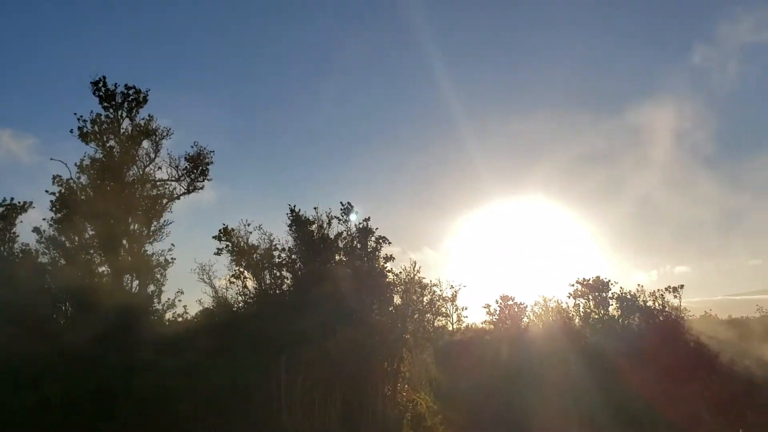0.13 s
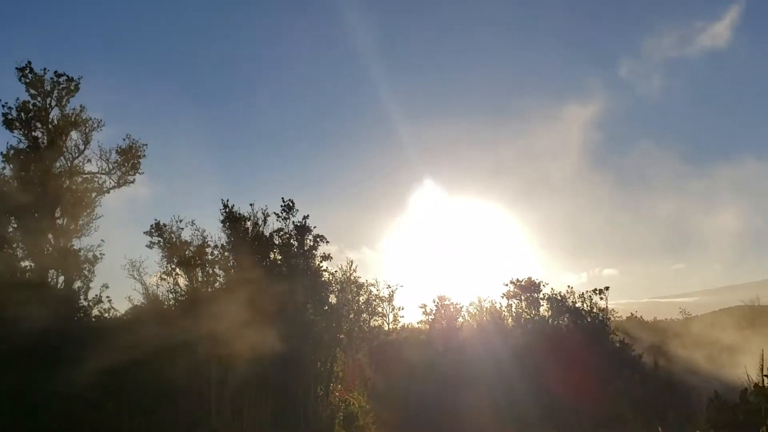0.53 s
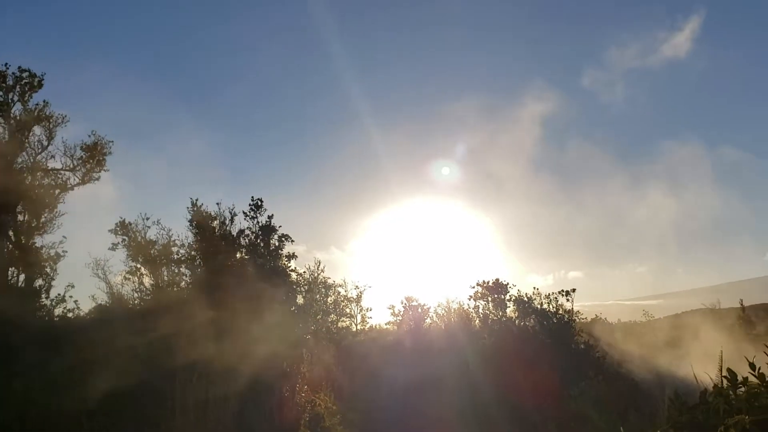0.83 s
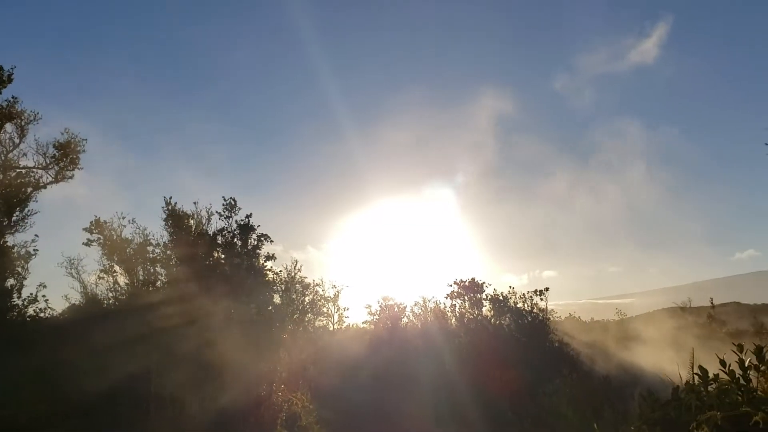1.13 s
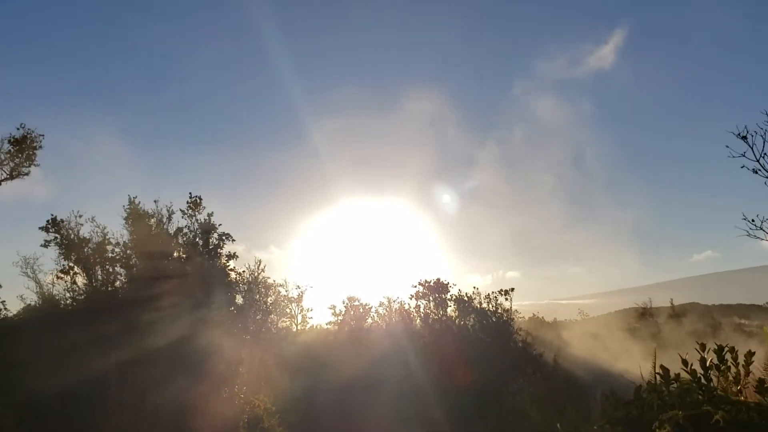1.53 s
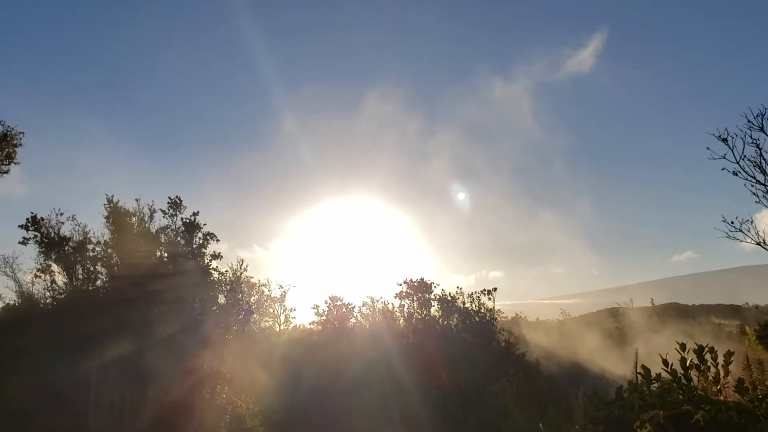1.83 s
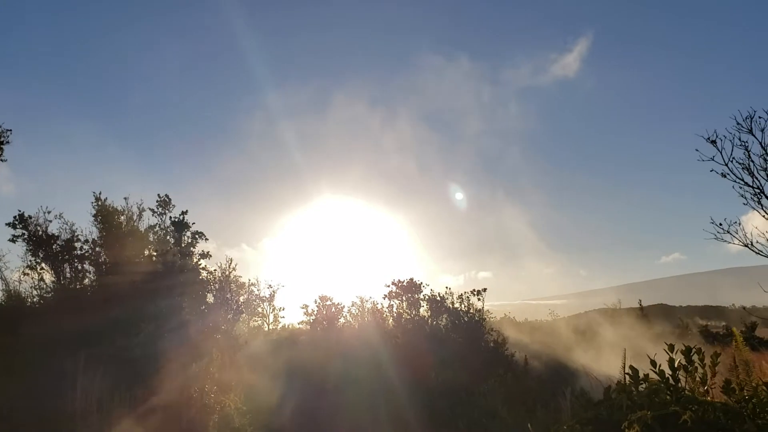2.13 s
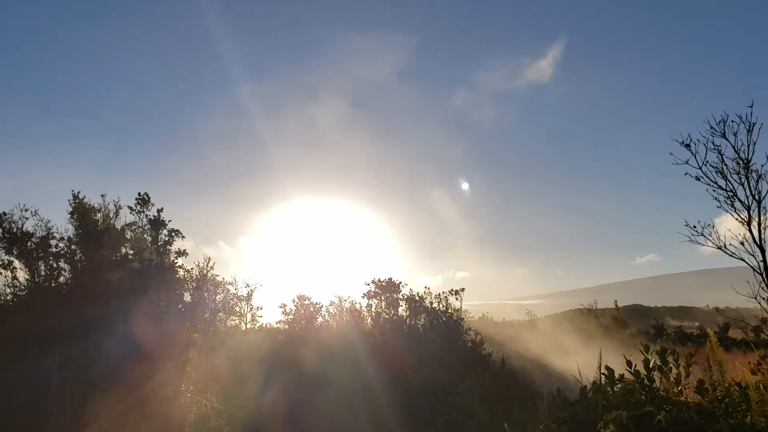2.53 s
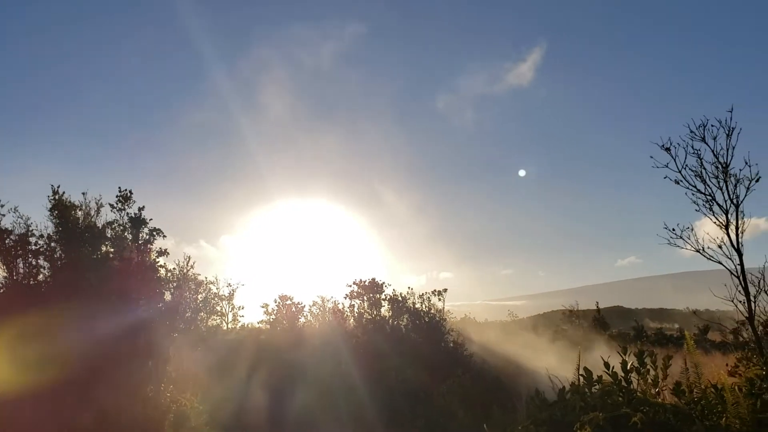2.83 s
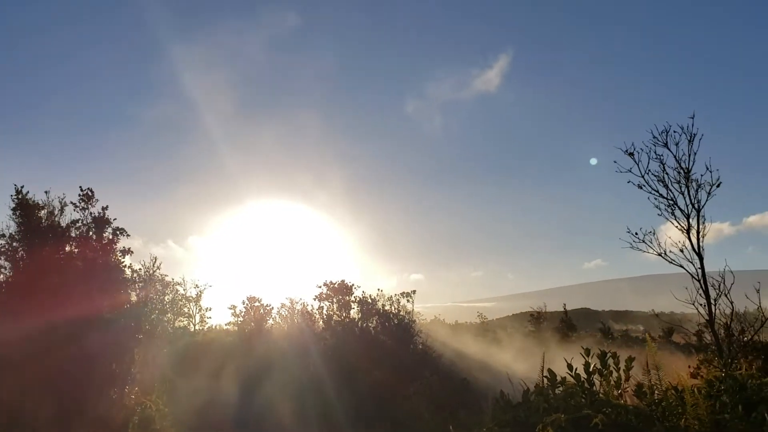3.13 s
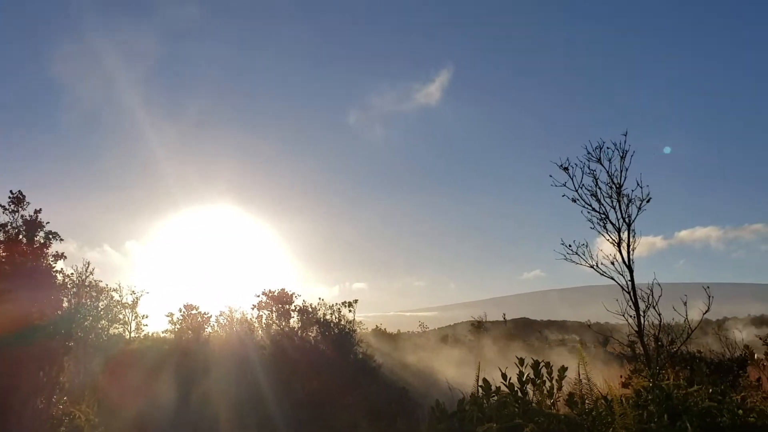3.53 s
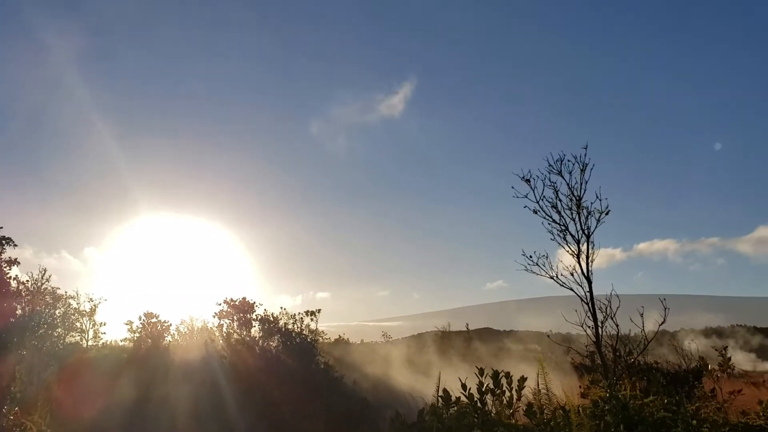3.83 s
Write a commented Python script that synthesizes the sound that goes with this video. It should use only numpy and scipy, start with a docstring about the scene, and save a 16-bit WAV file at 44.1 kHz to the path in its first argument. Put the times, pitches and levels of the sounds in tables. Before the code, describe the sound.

Wind buffeting a phone microphone outdoors, low fluttering thuds over very faint thin hiss.

```python
"""Gusty wind on a hillside

Gusty wind meets the two ports of a hand-held phone on an open, scrubby hillside. Eddies thump each port
and flutter across both: shaped noise that follows gusts and buffets. Noise and wavering sines make a hollow
rush in the lulls. Steam and leaves hiss thinly far off as noise bands, an insect ticks on the left and
fingers tap the case as decaying noise, and distant birds call as gliding sines."""
import sys
import numpy as np
from scipy import signal
from scipy.fft import rfft, irfft
from scipy.io import wavfile
from scipy.ndimage import uniform_filter1d

SR = 44100
rng = np.random.default_rng(int(sys.argv[2]) if len(sys.argv) > 2 else 0)


def wav_record(signal):
    """Record a signal, one row per channel, as 16-bit PCM in the file named by sys.argv[1]."""
    frames = np.transpose(np.atleast_2d(signal))
    bounded = np.clip(frames, -1, 1)
    # unit amplitude maps onto the largest positive 16-bit level
    quanta = np.round(bounded * 32767).astype(np.int16)
    wavfile.write(sys.argv[1], SR, quanta)


N = 176400  # samples, 4 s


def undb(db):
    """Amplitude ratio: 20 dB is a factor of ten."""
    return 10 ** (np.asarray(db) / 20)


def curve(table, order):
    """Envelope by linear interpolation: one column of a table, joined by straight lines in time."""
    rows = np.array(table, float)
    return np.interp(np.arange(N) / SR, rows[:, 0], rows[:, order])


def colour(x, points):
    """Spectral shaping: weight each row's spectrum by points joined over octaves, 40 dB/octave outside."""
    hz, db = np.array(points, float).T
    octave = np.log2(np.maximum(np.fft.rfftfreq(N, 1 / SR), 1))
    below = np.maximum(np.log2(hz[0]) - octave, 0)
    above = np.maximum(octave - np.log2(hz[-1]), 0)
    gain_db = np.interp(octave, np.log2(hz), db) - 40 * (below + above)
    return irfft(rfft(x) * undb(gain_db), N)


def unit(x):
    """Power normalisation: scale to rms 1."""
    return x / np.sqrt(np.mean(x ** 2))


def even(x, span_s):
    """Short-time power normalisation: hold the local rms near 1, so that only the wind sets the swells."""
    span = int(span_s * SR)
    power = uniform_filter1d(uniform_filter1d(x ** 2, span), span)
    return x / np.sqrt(power)


def walk(rate_hz, channels=2):
    """Low-frequency random modulation: normal values held 1 / rate seconds, smoothed to rms 1."""
    hold = max(int(SR / rate_hz), 2)
    held = np.repeat(rng.standard_normal((channels, N // 100)), hold, axis=1)[:, :N]
    return unit(uniform_filter1d(uniform_filter1d(held, hold), hold))


def noise():
    """Incoherent white noise: unrelated at the two ports."""
    return rng.standard_normal((2, N))


def pan(db):
    """Level difference, left minus right: gains whose squares always sum to 4."""
    left = 1 / (1 + undb(-np.asarray(db, float)) ** 2)
    return 2 * np.sqrt(np.array([left, 1 - left]))


def add(out, start_s, sound):
    """Superposition: mix a short stereo sound in at a time."""
    i = int(start_s * SR)
    out[:, i:i + sound.shape[1]] += sound[:, :N - i]


def hiss():
    """Broadband turbulence noise: two thin, flickering bands of far hiss over the still-air floor."""
    # far hiss before the port gains: t/s, high band level/dB, low band level/dB
    hiss_levels = [(0, -66.5, -80.5), (.9, -68.5, -85), (1.82, -69, -85.5), (2.05, -73, -88.5),
                   (2.6, -74, -89.5), (3.28, -71.5, -89.5), (3.38, -65, -82), (3.63, -65.5, -78),
                   (3.67, -62.5, -76), (3.72, -66, -79), (4, -68, -85.5)]
    # relative spectral density of the high band at each port: f/Hz, level/dB
    left_colour = [(8300, -22.5), (9500, -11), (10800, 1), (12000, -1), (13200, -6.5), (14500, -20.5),
                   (16000, -2)]
    right_colour = [(8500, -30.5), (9500, -14), (10800, 0), (11800, -6), (12800, -18.5), (14500, -22.5),
                    (16000, -10.5)]
    # relative spectral density of the low band: f/Hz, level/dB
    low_colour = [(5000, -10.5), (5800, -3.5), (6500, 2.5), (7300, -0.5), (8000, -7.5)]
    # relative spectral density of still air and microphone floor: f/Hz, level/dB
    air_colour = [(100, -5.5), (411, -20), (742, -8), (1660, -11.5), (3000, -16.5), (5000, -23),
                  (8230, -49.5), (11100, -15), (15500, -20)]
    flicker = undb(1.5 * walk(rate_hz=150))  # 1.5 dB spread
    source = noise() * flicker
    high = np.array([colour(source[0], left_colour), colour(source[1], right_colour)])
    high = unit(high) * np.sqrt(2)  # the gain of a centred pan
    low = unit(colour(noise() * flicker, low_colour)) * pan([-2])
    air = unit(colour(noise(), air_colour)) * undb(-74.5)
    return high * undb(curve(hiss_levels, order=1)) + low * undb(curve(hiss_levels, order=2)) + air


def rush():
    """Cavity resonance: steady air over a hollow, with a few notes wavering in pitch and level."""
    # rush before the port gains: t/s, level/dB
    rush_levels = [(0, -66.5), (.2, -62), (.74, -62.5), (.95, -68), (2.6, -78), (2.75, -76), (3.25, -79.5),
                   (4, -78)]
    # relative spectral density of the air noise: f/Hz, level/dB
    rush_colour = [(220, -11.5), (320, -6), (400, -5), (520, -8), (820, -7), (1150, -25.5), (1600, -36)]
    # wavering notes: mean f/Hz, mean amplitude/dB re the rms of the air noise
    rush_tones = [(220, -16), (372, -5.5), (435, -10.5), (765, -8.5)]
    waver_share, waver_db, waver_rate_hz = .04, 3, 70  # spread of pitch (as a fraction) and of level
    air = unit(colour(noise() * undb(2.0 * walk(rate_hz=13)), rush_colour))
    for hz, db in rush_tones:
        pitch, swell = walk(waver_rate_hz)
        phase = 2 * np.pi * np.cumsum(hz * (1 + waver_share * pitch)) / SR
        air = air + np.sin(phase) * undb(db + waver_db * swell)
    return air * undb(curve(rush_levels, order=1)) * pan([-1.5])


def insect_ticks(out):
    """Impulsive radiation: treble noise bursts that start at once and decay exponentially."""
    # onsets: t/s
    tick_times = [.063, .155, .248, .338, .431, .527, .622, .718, .897, .991, 1.082, 1.172, 1.265, 1.359,
                  1.449, 1.546, 1.627, 1.708, 1.997, 2.094, 2.187, 2.28, 2.375]
    # relative spectral density: f/Hz, level/dB
    tick_colour = [(9000, -30), (11000, -10), (13500, 0), (16000, 0)]
    onset_db, fade_db_per_s, t60_s = -61, -1.5, .05  # onset: both ports' power summed, at time zero
    t = np.arange(4096) / SR
    fizz = unit(colour(noise(), tick_colour))
    for start_s in tick_times:
        i = int(start_s * SR)
        level_db = onset_db + fade_db_per_s * start_s - 60 * t / t60_s
        add(out, start_s, fizz[:, i:i + len(t)] * undb(level_db) * pan([9]) / 2)


def finger_taps(out):
    """Damped impact: band-passed noise with an instant onset and exponential decay."""
    # taps: t/s, onset level/dB (both ports' power summed), left minus right/dB, brightness f/Hz, t60/s
    taps = [(0.221, -52, -18, 250, 0.022), (0.726, -62, -20, 900, .02), (.806, -51, -8, 8000, .011),
            (1.796, -65, -2, 11000, 0.14)]
    t = np.arange(4096) / SR
    grit = noise()
    for start_s, db, pan_db, hz, t60_s in taps:
        i = int(start_s * SR)
        edges_hz = [hz / 4, min(2 * hz, .45 * SR)]
        band = signal.butter(1, edges_hz, "bandpass", fs=SR, output="sos")
        tap = unit(signal.sosfilt(band, grit[:, i:i + len(t)]))
        add(out, start_s, tap * undb(db - 60 * t / t60_s) * pan([pan_db]) / 2)


def bird_calls(out):
    """Frequency modulation: sines glide in pitch, their level blurred apart at the two ports."""
    # calls: t/s, length/s, first f/Hz, last f/Hz, level/dB before blur and port gains, left minus right/dB
    birds = [(.24, .22, 2840, 2860, -94, 0), (.815, .045, 4150, 3750, -91, 5),
             (1.725, .05, 3520, 3150, -88, 0), (3.915, .045, 3420, 3330, -88, -3)]
    blur = undb(6 * walk(rate_hz=90))  # 6 dB spread
    for start_s, length_s, first_hz, last_hz, db, pan_db in birds:
        i = int(start_s * SR)
        u = np.linspace(0, 1, int(length_s * SR))
        phase = 2 * np.pi * np.cumsum(first_hz + (last_hz - first_hz) * u) / SR
        call = np.sin(phase) * np.sqrt(np.sin(np.pi * u))
        add(out, start_s, call * blur[:, i:i + len(u)] * undb(db) * pan([pan_db]))


def small_events():
    """Superposition of the brief sources: insect ticks, finger taps and bird calls."""
    out = np.zeros((2, N))
    insect_ticks(out)
    finger_taps(out)
    bird_calls(out)
    return out


def wind_db(order):
    """Addition of powers: the steady gust plus a bell-shaped swell for each buffet, as a level."""
    # steady wind: t/s, thump left level/dB, thump right level/dB, flutter level/dB before edge and port gains
    gust = [(0, -88, -43, -98), (.15, -89, -64.5, -83), (.75, -58, -54, -88), (.9, -65, -41, -50.5),
            (1.3, -62, -37.5, -53), (1.75, -67.5, -34.5, -53.5), (2.2, -58, -36.5, -48),
            (2.5, -66, -43, -58.5), (2.8, -51, -49, -73.5), (2.88, -74, -64, -88), (3.08, -80, -55, -65),
            (3.3, -68, -47.5, -73.5), (3.9, -56, -43.5, -60), (4, -96, -71, -82)]
    # buffets: centre t/s, length at half power/s, then the same three levels/dB
    buffets = [(0.4, 0.032, -60, -55, -78), (0.53, 0.059, -58, -48.5, -81), (0.864, 0.065, -37.5, -40, -55),
               (0.928, 0.034, -34, -27, -49.5), (1.036, 0.1, -28, -27.5, -45.5),
               (1.177, 0.074, -37.5, -26, -40.5), (1.3, 0.055, -23.5, -28.5, -39),
               (1.361, 0.041, -32, -29, -41), (1.48, 0.06, -32.5, -33.5, -59),
               (1.571, 0.038, -30, -46, -52.5), (1.641, 0.025, -31, -26.5, -38),
               (1.695, 0.039, -34.5, -31, -42.5), (1.739, 0.045, -63, -29.5, -42.5),
               (1.797, 0.026, -55, -28, -35.5), (1.827, .012, -68, -41, -38.5),
               (1.847, 0.017, -64, -28, -47), (1.947, 0.011, -73, -37, -37.5),
               (1.986, 0.018, -66, -29.5, -37), (2.018, 0.024, -28, -28, -34.5),
               (2.043, 0.014, -48, -27.5, -34), (2.09, 0.037, -62, -36.5, -42.5),
               (2.135, 0.022, -34, -26, -34.5), (2.154, 0.019, -47, -28, -37),
               (2.197, 0.028, -24.5, -22, -41.5), (2.3, 0.018, -22.5, -26, -34.5),
               (2.436, 0.032, -64, -34, -49.5), (2.522, 0.094, -68, -40.5, -55),
               (2.603, 0.05, -43, -40.5, -74), (2.678, 0.035, -66, -43, -77), (2.766, 0.022, -34, -39, -59),
               (2.974, 0.0091, -52, -41.5, -65.5), (3.098, 0.13, -42.5, -57, -77),
               (3.161, 0.036, -40, -33, -50), (3.299, 0.067, -41, -37, -59.5),
               (3.439, 0.08, -36.5, -36, -53), (3.553, 0.079, -48, -46, -84),
               (3.675, 0.18, -40.5, -38, -60.5), (3.808, 0.022, -43, -32, -42.5),
               (3.862, 0.032, -38, -35, -59.5), (3.942, 0.028, -48.5, -44, -63.5)]
    squareness = 3.36  # 2 would be a Gaussian bell
    t = np.arange(0, N, 32) / SR  # every 32nd sample is enough
    power = 0
    for row in buffets:
        half_lengths = np.abs(2 * (t - row[0]) / row[1])
        power = power + undb(row[order + 1]) ** 2 * .5 ** (half_lengths ** squareness)
    return 10 * np.log10(np.repeat(power, 32)[:N] + undb(curve(gust, order=order)) ** 2)


def flutter():
    """Small-eddy turbulence: bursts partly shared by the ports; the upper edge flares in the gusts."""
    # relative spectral density of the body and of the upper edge: f/Hz, level/dB
    body_colour = [(150, -23.5), (220, 3), (330, 6), (450, -1), (600, -15.5), (800, -40.5)]
    edge_colour = [(500, -10), (650, -7.5), (900, -13), (1200, -26.5), (1700, -43), (2400, -48)]
    # upper edge when flutter is at the reference, before bursts and port gains: t/s, level/dB
    edge_levels = [(.75, -66.5), (1.2, -59.5), (2.05, -52), (2.5, -82.5), (3.1, -64), (4, -80)]
    edge_slope, edge_ref_db = 1.2, -40  # edge dB per dB of flutter above the reference
    rate_hz, shared_db, own_db = 110, 1.5, 2.5  # burst spreads, before the body is evened
    bursts = undb(shared_db * walk(rate_hz, channels=1) + own_db * walk(rate_hz))
    db = uniform_filter1d(wind_db(order=3), size=64)
    eddies = noise() * bursts
    body = even(colour(eddies, body_colour), span_s=.03) * undb(db)
    edge_db = curve(edge_levels, order=1) + edge_slope * (db - edge_ref_db)
    edge = unit(colour(eddies, edge_colour)) * undb(edge_db)
    return (body + edge) * pan([-1.5])


def buffeting():
    """Turbulent pressure fluctuation: uneven low swings at each port, partly opposed."""
    # relative spectral density: f/Hz, level/dB
    thump_colour = [(24, -10.5), (65, 5.5), (100, 0), (216, -11.5), (400, -39)]
    opposed = .042  # share pushing the ports in opposite senses
    swings = noise() * undb(2.5 * walk(rate_hz=45))  # 2.5 dB spread before evening
    swings = even(colour(swings - opposed * swings[::-1], thump_colour), span_s=.04)
    port_db = np.array([wind_db(order=1), wind_db(order=2)])
    return swings * undb(uniform_filter1d(port_db, size=64))


def scene():
    """Superposition: all sources add at the two ports."""
    return hiss() + rush() + small_events() + flutter() + buffeting()


def record(dry):
    """Band limiting: the phone cuts the top with a steep elliptic low-pass at 15550 Hz."""
    low_pass = signal.ellip(10, .2, 70, 15550, fs=SR, output="sos")  # order, ripple dB, stop dB, edge Hz
    return signal.sosfilt(low_pass, dry)


dry = scene()
out = record(dry)
wav_record(out)
```